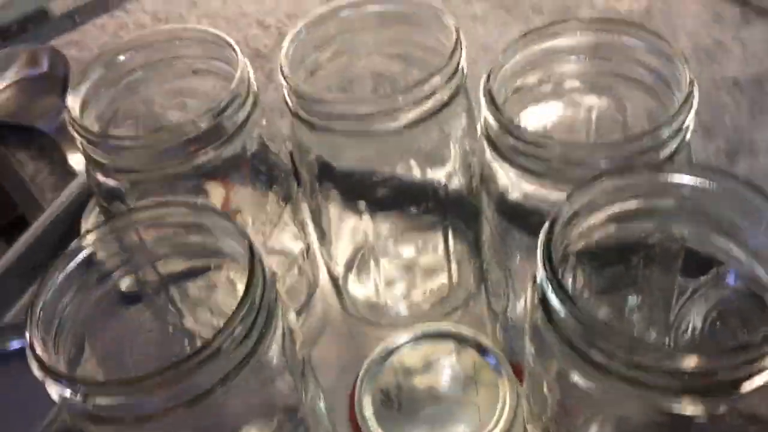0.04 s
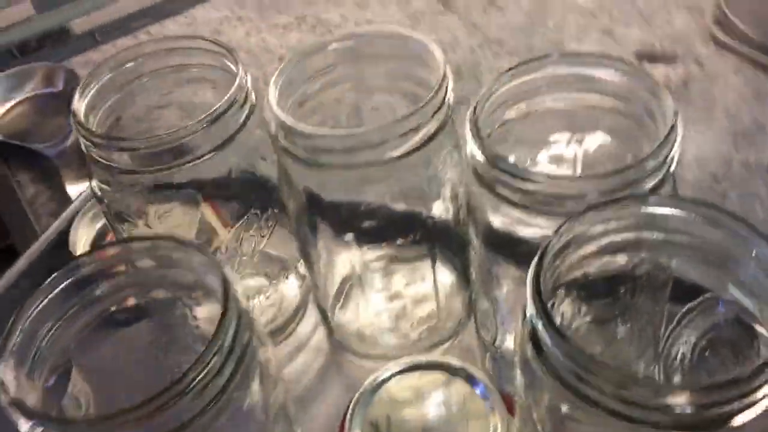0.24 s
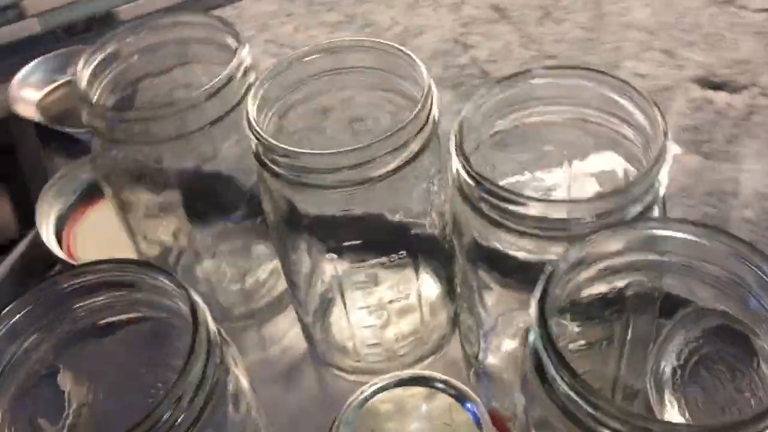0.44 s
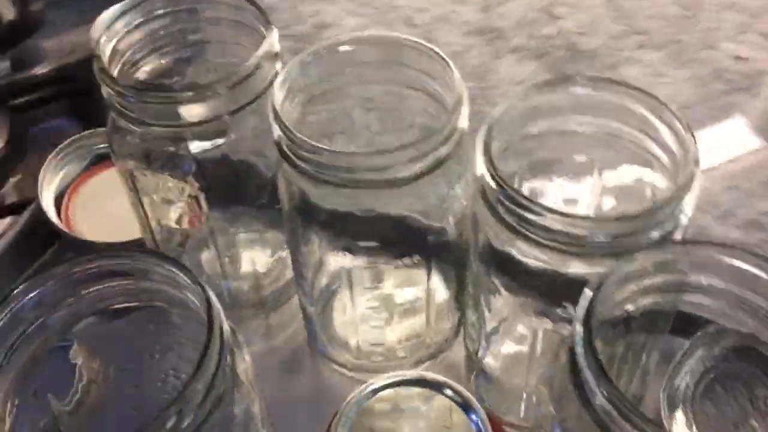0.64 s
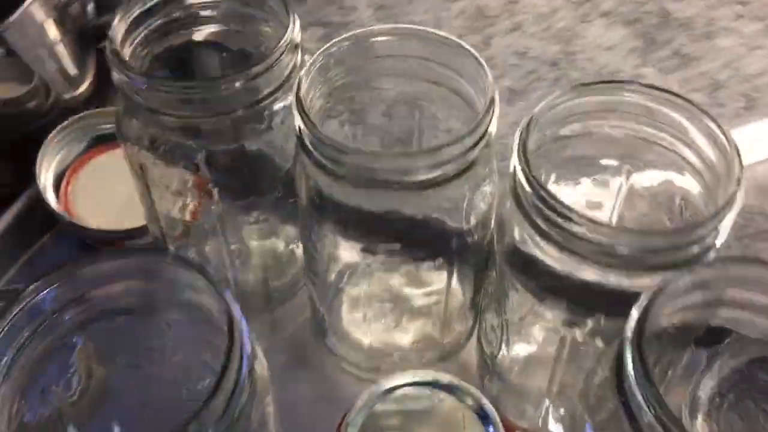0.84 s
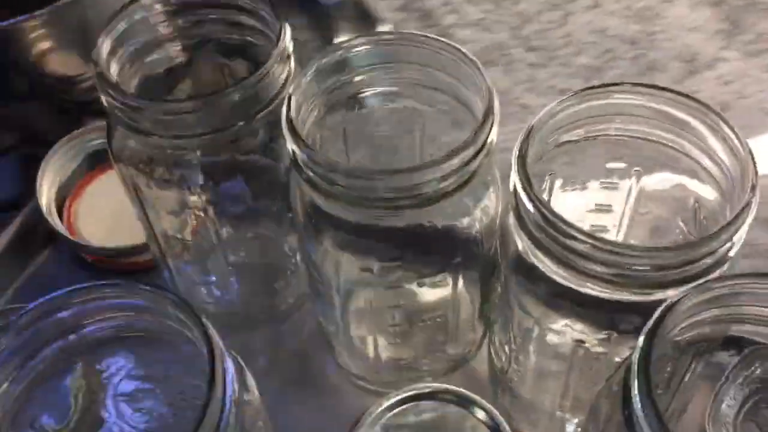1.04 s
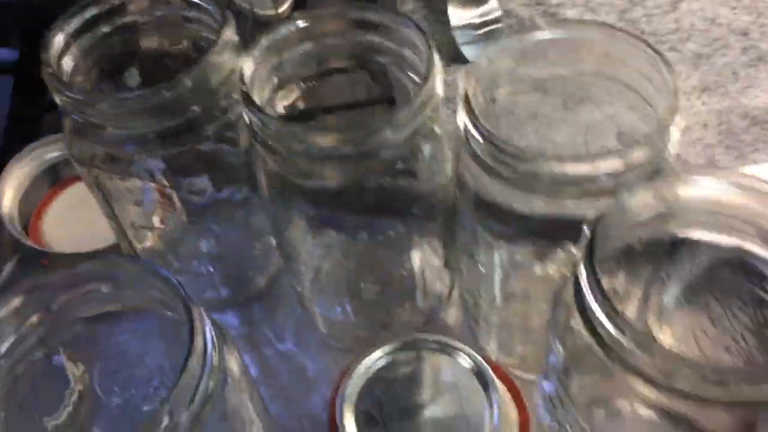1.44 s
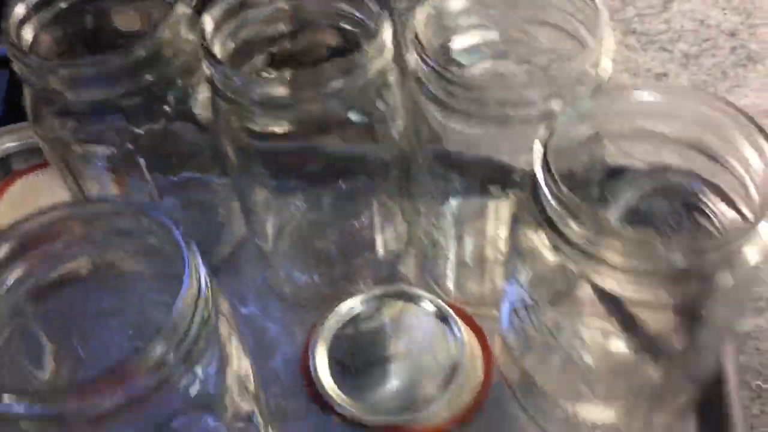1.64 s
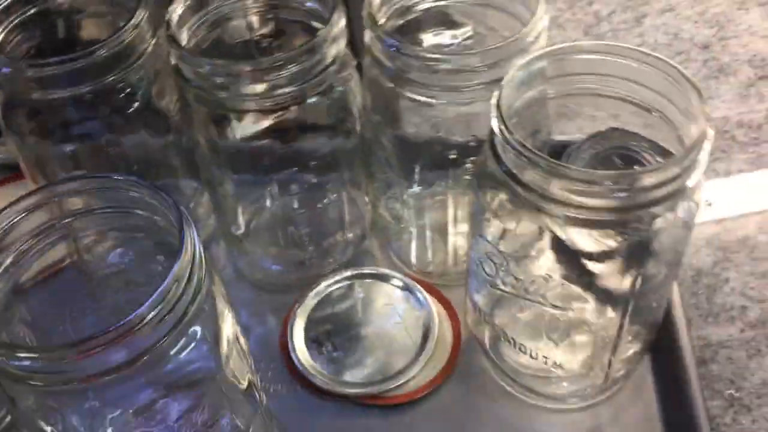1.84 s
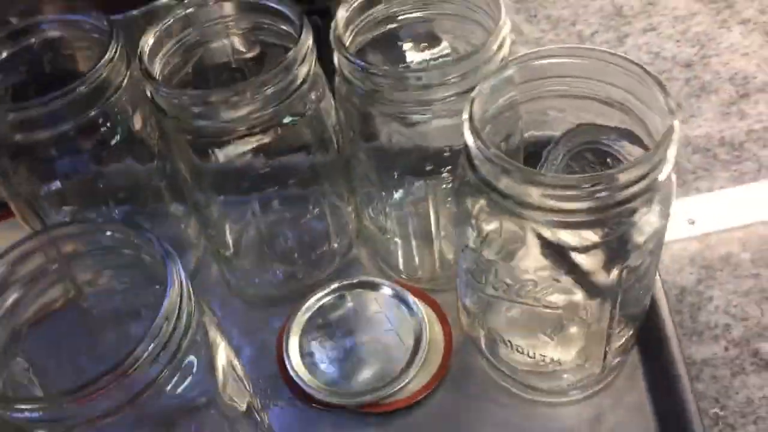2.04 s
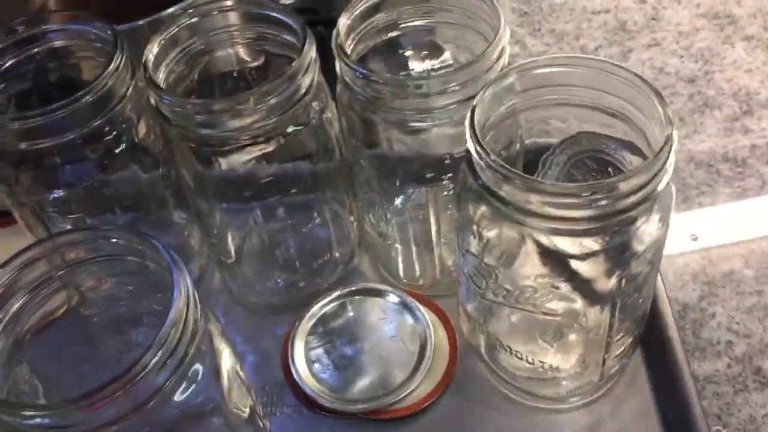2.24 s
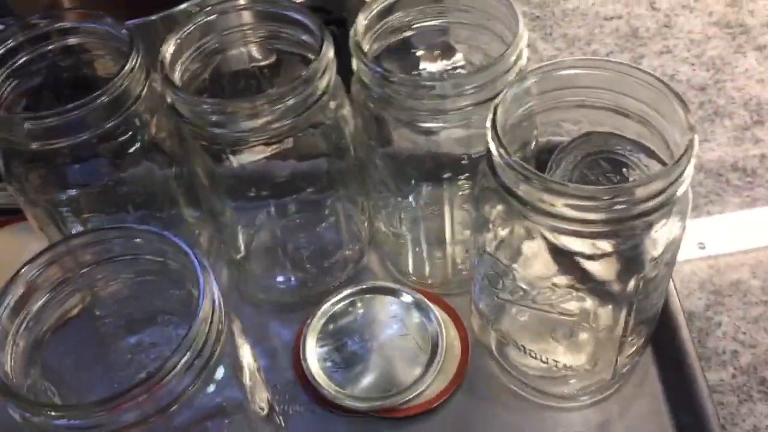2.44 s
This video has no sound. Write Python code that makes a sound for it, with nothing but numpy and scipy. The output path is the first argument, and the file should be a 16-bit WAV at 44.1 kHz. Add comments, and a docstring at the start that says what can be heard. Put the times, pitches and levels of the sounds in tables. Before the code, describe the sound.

Glass jars clink and rattle together on a metal tray shifted across a kitchen counter.

```python
"""Glass jars on a baking tray

Empty jars and their metal lids ride on a tray that is shifted about on a kitchen counter.
Rims clink and ring, bases knock on the tray, and the sliding metal scrapes and sets the glass buzzing.
The counter thumps under the heavier shoves; a small kitchen answers over a quiet room tone."""
import sys
import numpy as np
from scipy import signal
from scipy.fft import rfft, irfft, next_fast_len
from scipy.io import wavfile

SR = 44100
rng = np.random.default_rng(int(sys.argv[2]) if len(sys.argv) > 2 else 0)


def output_pcm(signal):
    """Save a mono or channel-first signal as 16-bit PCM at the path in sys.argv[1].

    Samples are clipped to [-1, 1] before scaling.
    """
    pcm = np.clip(np.atleast_2d(signal).T, -1, 1) * 32767
    wavfile.write(sys.argv[1], SR, np.round(pcm).astype(np.int16))


N = 110250
T = np.arange(SR * 3 // 4) / SR  # time within one hit [s]

# rim against rim (time [s], level [dB], boost of the two lowest modes [dB])
CLINKS = [(0.0404, -43.5, 2), (.578, -21, -3), (.586, -20.5, -4), (.6215, -27.5, 11), (.654, -23.5, 0),
          (.903, -25, -23), (.921, -38.5, 22.5), (.962, -32, -25), (.9956, -24.5, -23), (1.014, -23, 6),
          (1.058, -41.5, 16), (1.2935, -35, 6), (1.3349, -33.5, -14), (1.385, -38, 8.5), (1.5177, -40, 6),
          (1.8097, -21, 0.5), (1.8545, -28, 5), (1.885, -31.5, 2), (2.033, -30.5, 6.5), (2.0946, -24, 5),
          (2.2128, -27.5, -1), (2.222, -28, 5.5), (2.2931, -35, 7.5)]
# taps on a slightly higher jar (time [s], level [dB])
TAPS = [(.2045, -23.5), (.2284, -25.5), (.261, -20)]
# hard clashes of two jar walls (time [s], level [dB])
CLASHES = [(.1047, -41.5), (0.3142, -18.5)]
# a jar's lowest mode, singing on after a clink (frequency [Hz], level [dB], t60 [s])
SINGING_MODE = [(1905, -10, .75)]
# clinking rims (frequency [Hz], level [dB], t60 [s])
RIM_MODES = [(1929, -18.5, 1), (2000, -10, 0.2), (3510, -10.5, 0.32), (3515, -16, 0.24), (3730, -14, 0.13),
             (5253, -14.5, 0.17), (5560, -32, 0.12), (5940, -23, 0.11), (7810, -16.5, 0.12),
             (7830, -26, 0.17), (8400, -24.5, 0.2)]
# the higher jar (frequency [Hz], level [dB], t60 [s])
HIGH_JAR_MODES = [(1930, -10.5, 1), (3512, -14, 0.21), (3713, 1.5, 0.13), (5400, -13.5, 0.2),
                  (8300, -17.5, .12), (9880, -27, 0.099), (12540, -29, .1)]
# clashing walls (frequency [Hz], level [dB], t60 [s])
WALL_MODES = [(1380, -4, 0.089), (1447, -6.5, 0.57), (3490, -7, 0.35), (5020, -4.5, 0.19),
              (5460, -10.5, 0.16), (6220, -4, 0.062), (7670, -6, 0.085), (8740, -5.5, 0.11),
              (10060, -15, 0.089), (11480, -20, 0.18), (12630, -13.5, 0.089)]
# a loose lid (frequency [Hz], level [dB], t60 [s])
LID_MODES = [(2640, 3.5, .12), (3120, -8, .1)]
# crowded modes of all the touching jars (centre [Hz], half width [Hz], level [dB])
MODE_GROUPS = [(1952, 54, 17), (3632, 200, 12.5), (5716, 254, 4.5), (8100, 250, -5.5), (9800, 220, -10),
               (10920, 150, -13.5), (11530, 130, -14), (12270, 180, -15), (13700, 190, -18),
               (15200, 210, -21)]
# bases and lids hitting the tray (time [s], level [dB], brightness [dB/octave])
KNOCKS = [(0.1037, -31.5, 0.5), (.1321, -45, 12), (.204, -27.5, 1.5), (0.248, -22, 2), (0.3143, -14.5, 5),
          (.345, -22.5, 4), (.39, -24, -1.5), (0.4548, -16.5, -0.5), (.476, -19, 3), (0.495, -14, 0),
          (.517, -18.5, 1.5), (0.545, -29, 4.5), (0.6212, -23.5, 1), (0.8248, -27.5, -2), (.856, -22, -1.5),
          (0.985, -25.5, 2.5), (0.995, -23.5, 2), (1.018, -24.5, -6), (1.116, -28.5, -1),
          (1.211, -27.5, -0.5), (1.245, -28, 0), (1.267, -49, 16), (1.283, -31.5, 1), (1.407, -39.5, 11),
          (1.767, -24, 0.5), (1.808, -24.5, -0.5), (1.853, -27.5, -3), (1.916, -27.5, -1),
          (1.987, -28, -1.5), (2.0071, -26.5, 1), (2.0763, -15, -1), (2.0947, -18, 2), (2.135, -22, 1),
          (2.16, -23, 1), (2.389, -29.5, -3.5), (2.4807, -33, -1.5)]
# the loaded tray (frequency [Hz], level [dB], t60 [s])
TRAY_MODES = [(383.2, -6, 0.34), (509, -24, 0.28), (684, -4.5, 0.15), (1038, -12, 0.09), (1120, -5, 0.063)]
# tone of a knock's clatter (frequency [Hz], level [dB])
CLATTER_EQ = [(40, -45.5), (150, -20), (260, -5.5), (380, -0.5), (800, 1.5), (1400, -2), (2300, -6),
              (3000, -11), (4200, -13.5), (4900, -20), (6500, -22), (8800, -29), (10300, -35.5),
              (15500, -40)]
# decay of that clatter (frequency [Hz], t60 [s])
CLATTER_DECAY = [(100, 0.25), (400, 0.15), (1500, 0.19), (5000, 0.19), (14000, 0.2)]
# fader curve of the sliding tray (time [s], level [dB])
SLIDE_FADER = [(0, -51.5), (.1, -47.5), (.27, -31), (.44, -37), (.52, -21.5), (.66, -35.5), (0.759, -43),
               (0.952, -36), (1.03, -29), (1.18, -41.5), (1.32, -36.5), (1.42, -38), (1.5, -44.5),
               (1.606, -43.5), (1.611, -35), (1.654, -37), (1.675, -53), (1.75, -48), (1.83, -30.5),
               (1.97, -41.5), (2.14, -33), (2.25, -41), (2.5, -58.5)]
# tone of the scraping metal (frequency [Hz], level [dB])
SCRAPE_EQ = [(40, -34), (160, -18.5), (370, 1.5), (1200, 0.5), (2200, -6), (3000, -12), (6500, -23),
             (10000, -38), (16000, -59)]
# shoves that shake the counter (time [s], level [dB])
THUMPS = [(0.393, -48), (0.467, -46.5), (0.626, -47.5), (1.228, -50), (2.086, -43)]
# dull body of the counter (frequency [Hz], level [dB])
COUNTER_EQ = [(25, -14), (80, 7), (130, 8), (400, -18)]
# reverb time of the kitchen (frequency [Hz], t60 [s])
KITCHEN_DECAY = [(150, 0.68), (1000, 0.31), (4000, 0.24), (14000, 0.1)]
# room tone (frequency [Hz], level [dB])
ROOM_TONE_EQ = [(20, -24), (80, -1), (150, -15), (380, 0.5), (2000, -6.5), (4000, -41), (16000, -66)]

CRACK_T60 = 0.0035  # the snap at the front of a hit [s]


def jars():
    """Struck glass and one lid ring in their modes; each rim clink damps the one before."""
    out = np.zeros(N)
    gaps = np.diff([row[0] for row in CLINKS], append=N / SR)
    for (s, db, low_db), gap in zip(CLINKS, gaps):
        damping = fade(np.maximum(T - gap, 0), t60=0.31)
        rim = ring(SINGING_MODE + RIM_MODES + glints(), low_db)
        add(out, s, amp(db) * (rim * damping + neighbours()))
    for s, db in TAPS:
        add(out, s, amp(db) * (ring(HIGH_JAR_MODES) + amp(-3.5) * neighbours()))
    for s, db in CLASHES:
        add(out, s, amp(db) * ring(WALL_MODES))
    add(out, 0.2475, amp(-25.5) * ring(LID_MODES))  # the lid pings once
    return out


def glints(per_group=3, trim_db=-25.5, t60=0.19):
    """Sparkle: each clink picks its own thin partials around the high mode groups."""
    return [(hz + width * offset, db + trim_db, t60)
            for hz, width, db in MODE_GROUPS[4:]
            for offset in 2 * rng.standard_normal(per_group)]


def neighbours():
    """Touching jars ring briefly along, over the bright grit of the contact."""
    envelope = fade(T, t60=0.11) + 0.5 * fade(T, CRACK_T60)
    burst, grit = rng.standard_normal((2, len(T))) * envelope
    shimmer = colour(burst, glass_eq(shift=0.02))
    return amp(-3) * shimmer + amp(-16) * colour(grit, CLATTER_EQ, tilt=7.3)


def glass_eq(shift=0):
    """One resonant peak per mode group; shift detunes them at random, the high ones most."""
    centre, width, db = np.transpose(MODE_GROUPS)
    centre = centre * (1 + shift * centre / centre[-1] * rng.standard_normal(len(centre)))
    hz = np.linspace(0, SR / 2, 1025)
    peaks = amp(db) / (1 + ((hz[:, None] - centre) / width) ** 2) ** 1.24
    return np.column_stack([hz, 20 * np.log10(peaks.sum(axis=1))])


def knocks():
    """Bases and lids hit the tray: a crack, a dense clatter and the damped ring of the metal."""
    out = np.zeros(N)
    for s, db, tilt in KNOCKS:
        crack = amp(2) * rng.standard_normal(len(T)) * fade(T, CRACK_T60)
        clatter = colour(dying_noise(CLATTER_DECAY) + crack, CLATTER_EQ, tilt)
        tray = amp(-12 - tilt) * ring(TRAY_MODES)  # a brighter knock moves the tray less
        # a weak, dull knock is a soft shove that swells in
        attack_s = 0.0036 * np.exp(0.3445 * (-23 - db) - 0.6 * tilt)
        add(out, s, amp(db) * (clatter + tray) * (1 - fade(T, attack_s)))
    return out


def slide(contacts_per_s=900, spread_db=3.5, contact_t60=0.063):
    """The sliding tray makes many tiny contacts that scrape on the metal and buzz in the jars."""
    contacts = (rng.random(N) < contacts_per_s / SR) * amp(spread_db * rng.standard_normal(N))
    energy = signal.fftconvolve(contacts ** 2, fade(T, contact_t60) ** 2)[:N]
    chatter = np.sqrt(np.abs(energy)) * rng.standard_normal((2, N))
    scrape = unit(colour(chatter[0], SCRAPE_EQ))
    buzz = unit(colour(chatter[1], glass_eq()))
    fader_db = np.interp(np.arange(N) / SR, *np.transpose(SLIDE_FADER))
    return amp(fader_db) * (scrape + amp(-14.5) * buzz)


def counter():
    """The worktop gives a low thump under the heavier shoves."""
    out = np.zeros(N)
    envelope = (1 - fade(T, t60=0.034)) * fade(T, t60=0.59)
    for s, db in THUMPS:
        rumble = unit(colour(rng.standard_normal(len(T)), COUNTER_EQ))
        add(out, s, amp(db) * rumble * envelope)
    return out


def kitchen(x, tails=14):
    """Short, even reverb off hard nearby surfaces, crossfaded between several random tails."""
    out = np.zeros(N)
    tail_index = np.linspace(0, tails - 1, N)
    for k in range(tails):
        tail = dying_noise(KITCHEN_DECAY) * (1 - fade(T, t60=0.005))
        send = np.sqrt(np.maximum(1 - abs(tail_index - k), 0))
        active = np.flatnonzero(send)
        wet = signal.fftconvolve((x * send)[active], tail / np.linalg.norm(tail))
        add(out, active[0] / SR, wet)
    return out


def room_tone():
    """A steady bed of dark noise."""
    return colour(rng.standard_normal(N), ROOM_TONE_EQ)


def ring(modes, low_db=0, scatter_db=3, detune=0.0018):
    """Damped sine modes; every point of contact weights and tunes them a little differently."""
    hz, db, t60 = np.transpose(modes)
    level_draw, pitch_draw, polarity_draw = rng.standard_normal((3, len(hz)))
    db = db + scatter_db * level_draw
    db[:2] += low_db
    hz = hz * (1 + detune * pitch_draw)
    partials = np.sin(2 * np.pi * hz[:, None] * T) * fade(T, t60[:, None])
    return (amp(db) * np.sign(polarity_draw)) @ partials


def dying_noise(decay):
    """A wash of countless close modes, each band dying at its own speed."""
    hz, t, bands = signal.stft(rng.standard_normal(len(T)), SR, nperseg=256)
    bands *= fade(t, along(decay, hz)[:, None])
    return signal.istft(bands, SR, nperseg=256)[1][:len(T)]


def colour(x, eq, tilt=0, size=2048):
    """Unit-energy EQ, tilted in dB per octave."""
    hz = np.fft.rfftfreq(size, 1 / SR)
    db = along(eq, hz) + tilt * np.log2(np.clip(hz, 200, 9000))
    # minimum phase, so nothing rings ahead of a hit
    cepstrum = irfft(np.log(amp(db)))
    cepstrum[1:size // 2] *= 2
    cepstrum[size // 2 + 1:] = 0
    impulse = irfft(np.exp(rfft(cepstrum)))
    return signal.fftconvolve(x, impulse / np.linalg.norm(impulse))[:len(x)]


def along(curve, hz):
    """Read a curve on a log frequency axis."""
    knots_hz, values = np.transpose(curve)
    return np.interp(np.log(hz + 1), np.log(knots_hz + 1), values)


def fade(t, t60):
    """Decay by 60 dB in t60 seconds."""
    return np.exp(-np.log(1000) * t / np.maximum(t60, 1e-3))


def amp(db):
    """Decibels to gain."""
    return 10 ** (np.asarray(db) / 20)


def unit(x):
    """Scale to rms 1."""
    return x / np.sqrt(np.mean(x ** 2) + 1e-20)


def add(track, s, sound):
    """Mix a sound into the track at s seconds."""
    start = int(np.clip(round(s * SR), 0, N - 1))
    track[start:start + len(sound)] += sound[:N - start]


def scene():
    """Mono mix: jars and tray up front, kitchen reverb behind, room tone underneath."""
    close = jars() + knocks() + slide() + counter()
    bed = amp(-51) * room_tone()
    reverb = amp(-11) * kitchen(close)
    return (amp(0.5) * (close + reverb) + bed)[None]


def record(dry):
    """A brick-wall high cut at 16 kHz."""
    size = next_fast_len(N + SR // 2)
    passband = np.fft.rfftfreq(size, 1 / SR) < 16000
    return irfft(rfft(dry, size) * passband, size)[..., :N]


dry = scene()
out = record(dry)
output_pcm(out)
```